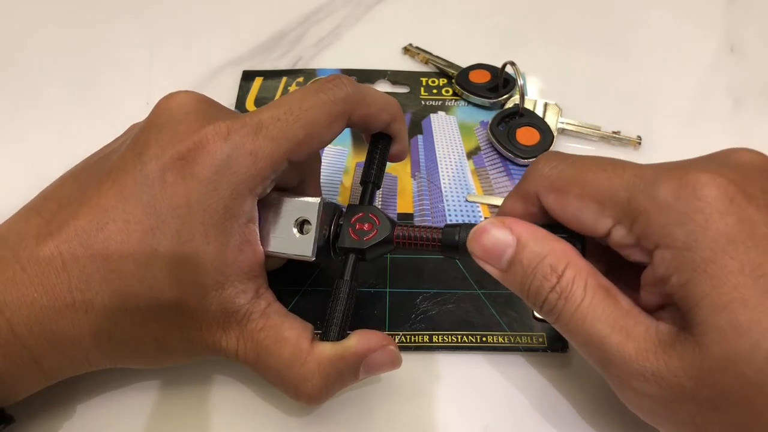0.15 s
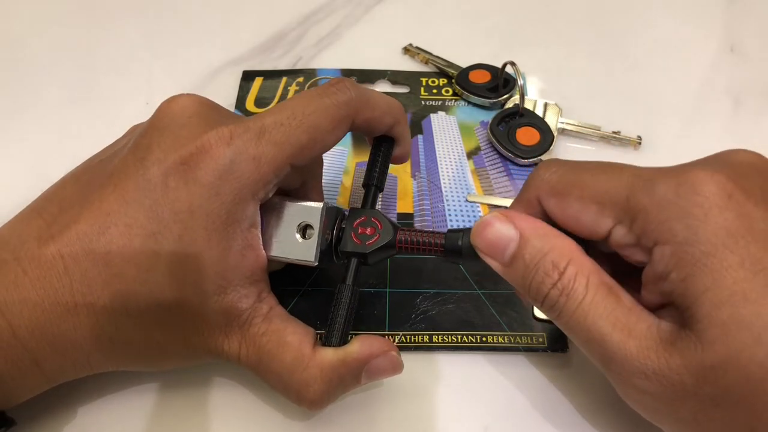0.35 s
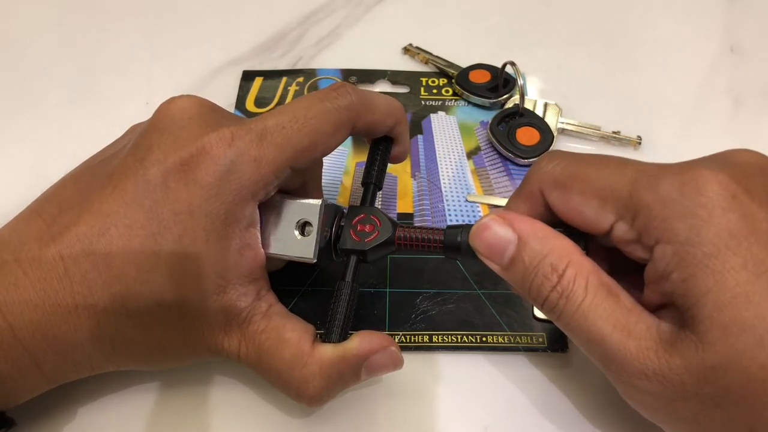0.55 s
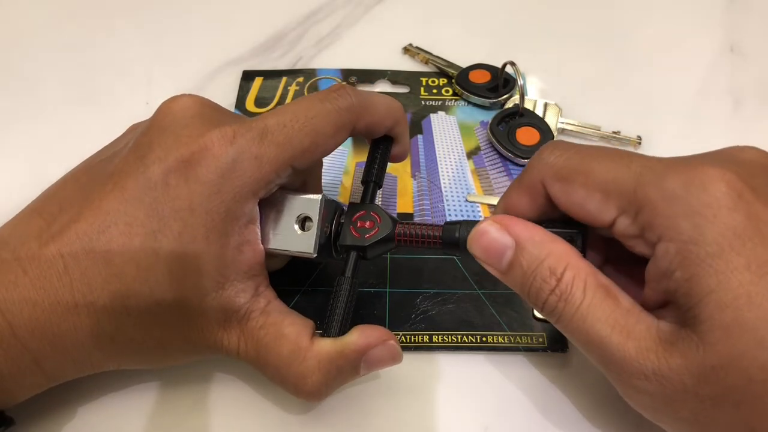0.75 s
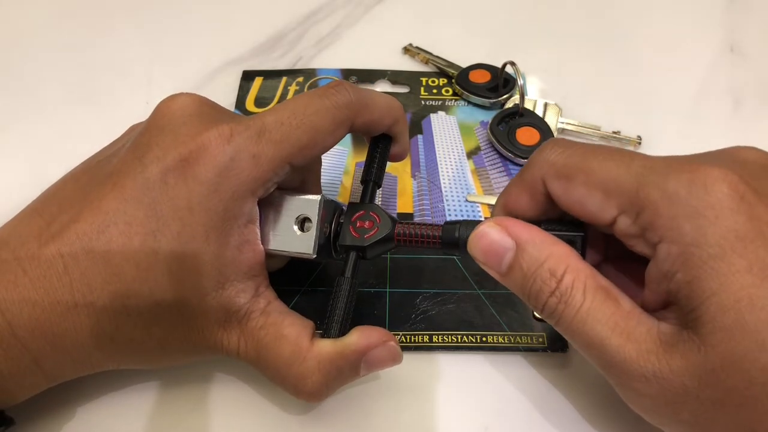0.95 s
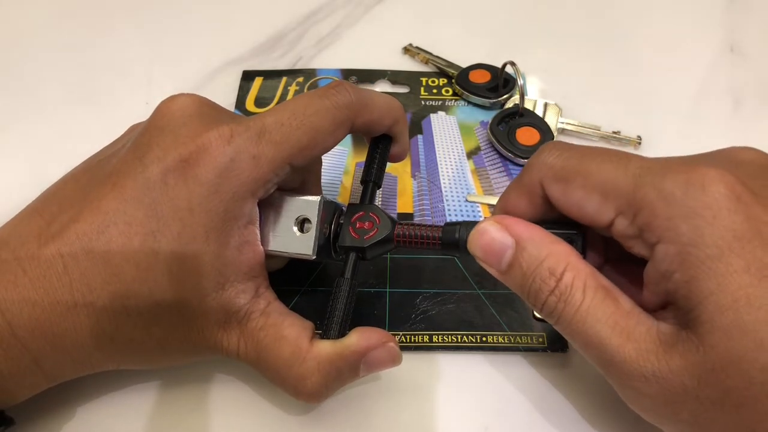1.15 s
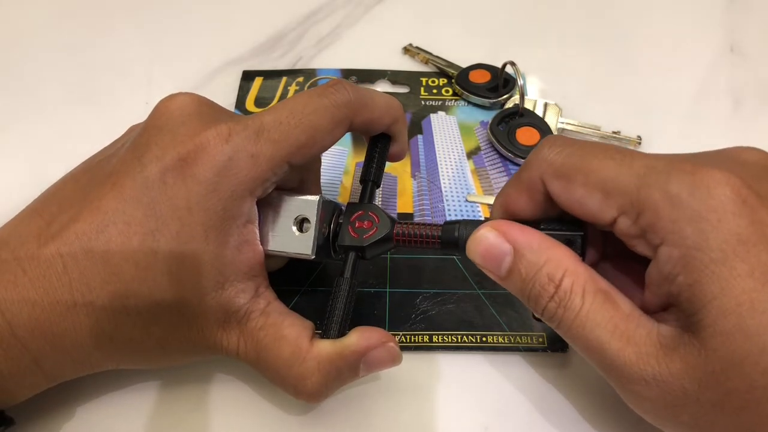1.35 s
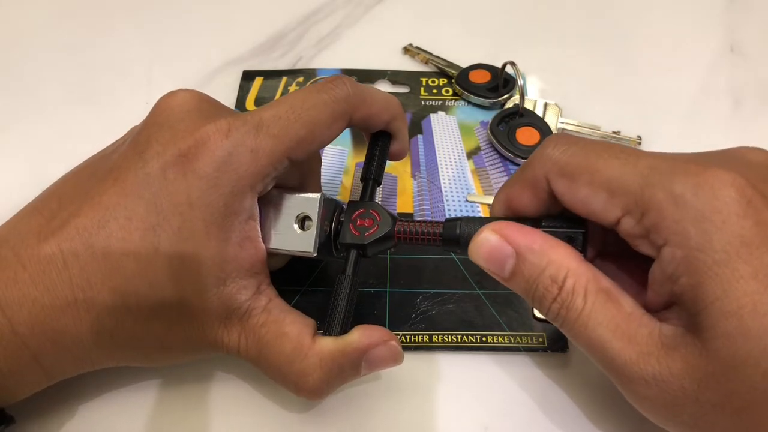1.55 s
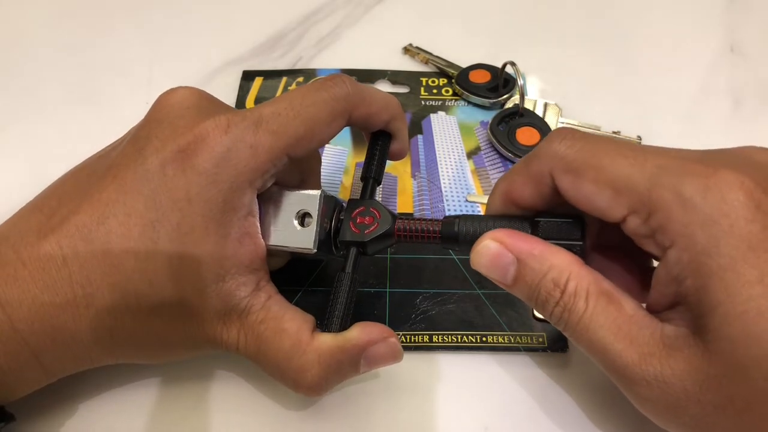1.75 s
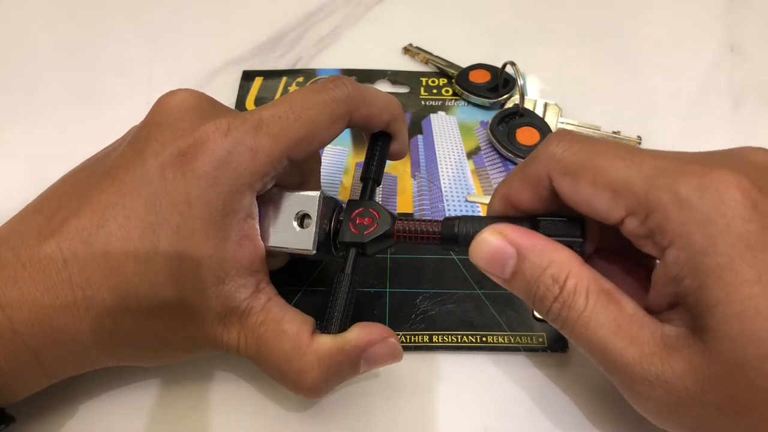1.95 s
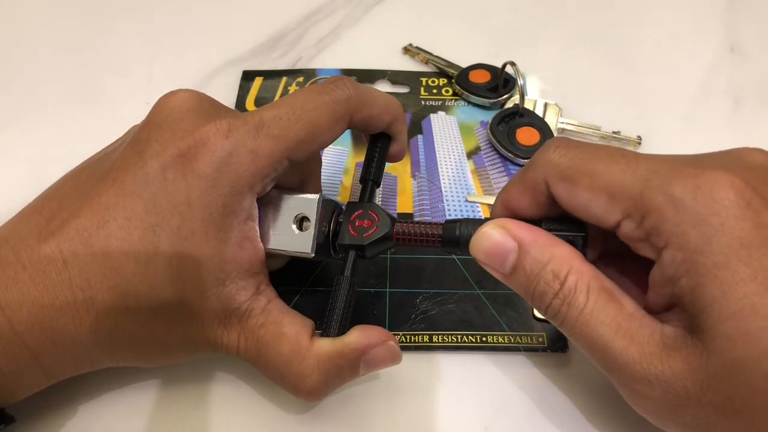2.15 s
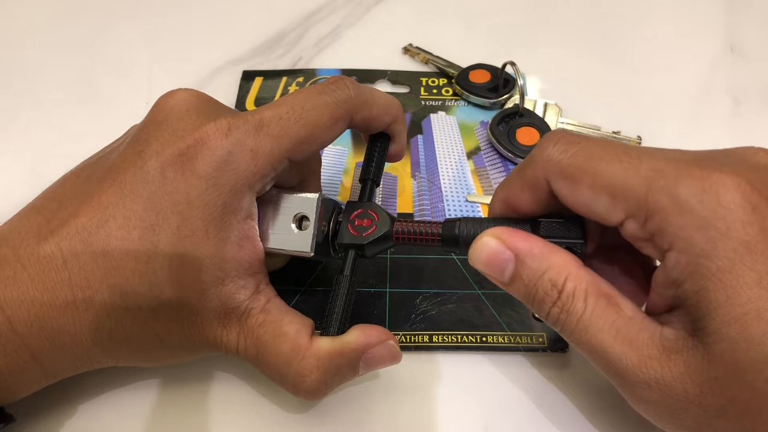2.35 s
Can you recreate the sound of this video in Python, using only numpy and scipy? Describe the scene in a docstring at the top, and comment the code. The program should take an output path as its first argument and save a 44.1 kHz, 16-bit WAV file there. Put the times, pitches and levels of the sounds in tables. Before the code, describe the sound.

A padlock is picked close by in a small quiet room. Light ticks and dull handling bumps come at about 0.1 seconds, then one bright, very short metal click at 0.2 seconds, with a few more soft bumps. Fingers rub faintly on the tool. At 1.6 seconds the pick gives a softer, scratchy click, followed by tiny ticks near 1.9. Low hum and hiss continue until about 2.5 seconds.

```python
"""Light ticks and dull bumps come first, as a disc padlock is picked by hand in a small quiet room.
A disc snaps round with one bright click; later the pick tip chatters over a disc. Each impact excites
the normal modes of the metal, which the hands damp within milliseconds. Fingers rub on the tool,
making friction noise; mains hum, room rumble and hiss lie beneath."""
import sys
import numpy as np
from scipy import signal
from scipy.fft import rfft, irfft
from scipy.io import wavfile

SR = 44100
rng = np.random.default_rng(int(sys.argv[2]) if len(sys.argv) > 2 else 0)


def transcribe(u):
    """Save the signal u as a 16-bit wav file named by the first command-line argument.

    u: samples, shape (n,) or (channels, n), limited to [-1, 1]; the rate is SR.
    q: integer samples, one column per channel.
    """
    v = np.clip(np.atleast_2d(u).T, -1, 1)
    q = np.round(v * 32767).astype(np.int16)
    wavfile.write(sys.argv[1], SR, q)


N = 110250

# a disc hits its stop and rebounds: start_s, level_db
DISC_SNAPS = [(0.233513, -31.5), (0.234305, -8.6), (0.238166, -34)]
# modes of the disc in the lock body: pitch_hz, gain_db, t60_s
DISC_MODES = [(1100, -18, 0.0018), (1840, -36.5, 0.033), (2340, -29, 0.025), (3010, -37, .0097),
              (4440, -30.5, 0.019), (5071, -10, .0017), (6530, -14.5, 0.0015), (7760, -7.5, 0.0073),
              (8209, -13.5, .0047), (10000, -4.5, 0.0029), (11609, -19.5, 0.0063), (13900, -17, .0051),
              (14390, .2, .0077), (15420, -25, .019)]
# contacts of the pick tip with a disc: start_s, level_db
PICK_CHATTER = [(1.604366, -35.8), (1.604865, -43), (1.605523, -24.9), (1.606997, -42), (1.60761, -33.5),
                (1.608918, -49)]
# modes of the pick: pitch_hz, gain_db, t60_s
PICK_MODES = [(1740, -27, .025), (2280, -10, 0.015), (2770, -19, 0.017), (3486, -18, 0.017),
              (4320, 4.5, 0.0021), (4670, -16.5, 0.015), (5500, -4, 0.0033), (6430, -6.5, 0.02),
              (7340, -8, 0.0078), (7900, -13, 0.0087), (11650, -9, 0.013), (12500, -15, .008),
              (13600, -11, .0144), (14800, -4, 0.0074), (15300, -17, 0.026)]
# spectra of the fizz after the snap and the chatter: frequency_hz, gain_db
DISC_FIZZ = [(300, 8), (900, -4), (2000, -2), (5000, -2), (7200, -2), (8200, 5.5), (9300, -6.5),
             (11500, -8), (13700, -6.5), (14600, 12.5), (15700, 0), (16100, -19)]
PICK_FIZZ = [(1000, -28), (2500, -2), (4200, 5), (6000, -2), (8200, -2), (10500, -4), (14000, -5),
             (15100, 11), (15650, 14), (16000, -22)]
# touches of the pick in the keyway: start_s, level_db, centre_hz, width_octaves, decay_s
KEYWAY_TICKS = [(0.0158, -53, 11000, 0.82, 0.00066), (0.1212, -48, 14300, .12, 0.00094),
                (0.1223, -52, 5000, .8, 0.0012), (0.1236, -50.5, 3200, 0.96, .0028),
                (0.1243, -44, 6850, 0.14, .001), (0.1293, -44.5, 6310, .22, 0.00046),
                (0.211, -54.5, 13000, .5, 0.0004), (0.2468, -53, 3800, .6, .0016),
                (0.2535, -60.5, 2500, 0.79, 0.0019), (0.2705, -60, 3780, 0.65, .002),
                (0.2805, -59, 3500, 0.98, 0.0037), (1.9027, -61, 8470, .13, 0.00095),
                (1.953, -66.5, 2820, 0.37, 0.0054)]
# the lock shifts in the hand: start_s, level_db
BODY_BUMPS = [(0.1032, -44.5), (0.1156, -50.5), (0.1243, -42.5), (0.1324, -47), (0.2345, -53),
              (0.2515, -52.5), (0.2620, -46), (0.2675, -48.5), (0.2785, -46), (0.2875, -55)]
# modes of the hand-held lock body: pitch_hz, gain_db, t60_s
BODY_MODES = [(551, -5.5, 0.01), (809, -3.5, .010), (1216, -8.5, 0.0028)]
# fingers rub and shift their grip: middle_s, half_length_s, level_db, centre_hz, width_octaves
FINGER_RUBS = [(0.131, 0.03, -56, 191, 0.38), (0.293, 0.061, -57, 165, .2), (0.638, 0.12, -68.5, 326, 1.37),
               (0.74, 0.095, -76.5, 2957, 0.66), (1.404, 0.012, -69, 2410, .6),
               (1.509, 0.1, -79, 3490, 0.54), (1.98, 0.051, -77.5, 2800, 0.98),
               (2.397, .13, -75.5, 12000, 1.6)]
# spectrum of the reverberation: frequency_hz, gain_db
ROOM_COLOUR = [(300, 15), (900, 4), (2000, 3.5), (4500, 1), (7600, -11.5), (8400, -7.5), (9500, -8),
               (11000, -5.5), (13400, -9), (14400, -9.5), (14950, -8), (16200, -17)]
# envelope of the mains hum: time_s, level_db
MAINS_LEVEL = [(0, -66), (1.2, -69), (1.45, -64), (2.1, -64), (2.5, -64.5)]
# narrow bands of hum and whirr: centre_hz, width_hz, level_db
HUM_BANDS = [(49, 11, -71.5), (161.6, 14, -65.5), (205, 5.9, -69.5), (250.6, 17, -69.5), (3410, 440, -77.5)]
# spectra of the room's rumble and hiss: frequency_hz, gain_db
RUMBLE_SPECTRUM = [(25, -32), (45, -15), (70, -14), (120, -7.5), (170, -8), (260, -4), (315, -4),
                   (400, -11), (470, -16.5), (600, -24.5), (810, -16.5), (1200, -25.5), (2000, -42),
                   (4000, -59.5)]
HISS_SPECTRUM = [(300, -38.5), (1500, 3), (1950, -2), (2350, 0.5), (2850, -5), (4200, -7.5), (6500, -8),
                 (8000, -12), (10200, -10.5), (12500, -13), (15600, -8.5), (16100, -41)]


def disc_snap():
    """Impact excitation: a disc strikes its stop and rebounds, ringing at each contact."""
    return strike(DISC_SNAPS, DISC_MODES, crack_db=-26.5, crack_s=.0041, rise_s=.0001, low_hz=650)


def pick_chatter():
    """Repeated impact: contacts in quick succession excite the modes of the pick."""
    return strike(PICK_CHATTER, PICK_MODES, crack_db=-7.5, crack_s=.0017, rise_s=.00006, low_hz=1830)


def body_bumps():
    """Heavy damping: the hand absorbs the vibration of the shifting lock, leaving dull bumps."""
    return strike(BODY_BUMPS, BODY_MODES, crack_db=-20.5, crack_s=.0014, rise_s=.000089, low_hz=250.2)


def strike(hits, modes, crack_db, crack_s, rise_s, low_hz):
    """Modal superposition: each contact gives damped sinusoids and a crack; little bass is radiated."""
    out, size = np.zeros(N), SR // 20
    for start, db in hits:
        span = slice(int(start * SR), int(start * SR) + size)
        age = since(start)[span]
        ring = sum(undb(mode_db) * np.cos(2 * np.pi * hz * age) * burst(age, rise_s, t60 / np.log(1000))
                   for hz, mode_db, t60 in modes)
        crack = undb(crack_db) * rng.standard_normal(size) * burst(age, rise_s, crack_s)
        out[span] += undb(db) * (ring + crack)
    return signal.sosfilt(signal.butter(3, low_hz, "highpass", fs=SR, output="sos"), out)


def fizz(hits, spectrum, level_db):
    """Exponential decay: faint toneless noise dies away after the hardest contact of a click."""
    hardest_s = max(hits, key=lambda hit: hit[1])[0]
    return undb(level_db) * noise(colour(spectrum)) * burst(since(hardest_s), .00053, decay_s=.042)


def keyway_ticks():
    """Transient excitation: each light touch of the pick radiates a brief band of noise."""
    return sum(undb(db) * noise(band(hz, octaves)) * burst(since(start), rise_s=.00024, decay_s=decay)
               for start, db, hz, octaves, decay in KEYWAY_TICKS)


def finger_rubs(top_hz=15800, grain_hz=154, grain_db=2):
    """Stick-slip friction: skin catches and slides on the handle, giving grainy swells of noise."""
    grain = undb(grain_db * noise(lambda f: np.exp(-f / grain_hz)))
    slide = np.zeros(N)
    for middle, half, db, hz, octaves in FINGER_RUBS:
        friction = noise(lambda f: band(hz, octaves)(f) * (f < top_hz))
        slide += undb(db) * friction * swell(middle, half)
    return slide * grain / np.sqrt(np.mean(grain ** 2))


def reverberation(x, t60_s=.33, gap_s=.0013, build_s=.00053):
    """Convolution with decaying noise models the room's diffuse reflections, weaker in the treble."""
    tail = rng.standard_normal(N) * burst(since(gap_s), build_s, t60_s / np.log(1000))
    tail /= np.sqrt(np.sum(tail ** 2))
    f = np.maximum(np.arange(N + 1) * SR / (2 * N), 1)
    return irfft(rfft(x, 2 * N) * rfft(tail, 2 * N) * colour(ROOM_COLOUR)(f))[:N]


def mains_hum(pitch_hz=100.9):
    """A pure tone at twice the supply frequency; its level dips, then grows a little."""
    level_db = np.interp(since(0), *np.array(MAINS_LEVEL).T)
    return undb(level_db) * tone(pitch_hz)


def drone(pitch_hz=199.5, level_db=-58):
    """Amplitude modulation: a low tone swells once out of the rumble."""
    return undb(level_db) * tone(pitch_hz) * swell(middle_s=.97, half_length_s=.085)


def room_noise(rumble_db=-59, drift_db=.8, hiss_db=-73):
    """Incoherent sources add in power: drifting rumble, wavering narrow-band hum and even hiss."""
    drift = noise(lambda f: np.exp(-f / 5))
    rumble = undb(rumble_db + drift_db * drift) * noise(colour(RUMBLE_SPECTRUM))
    hum = sum(undb(db) * noise(lambda f: 1 / (1 + ((f - hz) / width * 2) ** 2))
              for hz, width, db in HUM_BANDS)
    return rumble + hum + undb(hiss_db) * noise(colour(HISS_SPECTRUM))


def undb(db):
    """Decibels to amplitude ratio."""
    return 10 ** (np.asarray(db) / 20)


def tone(hz):
    """Sinusoid of unit rms."""
    return np.sqrt(2) * np.sin(2 * np.pi * hz * since(0))


def noise(gain):
    """Spectral shaping: white noise weighted by gain(frequency), scaled to unit rms."""
    f = np.maximum(np.arange(N // 2 + 1) * SR / N, 1)
    shaped = irfft(rfft(rng.standard_normal(N)) * gain(f), N)
    return shaped / np.std(shaped)


def colour(points):
    """Gain curve through (frequency_hz, gain_db) points on a log-frequency axis."""
    hz, db = np.array(points, float).T
    return lambda f: undb(np.interp(np.log(f), np.log(hz), db))


def band(hz, octaves):
    """Gaussian passband on a log-frequency axis."""
    return lambda f: np.exp(-.5 * (np.log2(f / hz) / octaves) ** 2)


def since(start_s):
    """Seconds elapsed since an onset, zero before it."""
    return np.maximum(np.arange(N) / SR - start_s, 0)


def burst(age, rise_s, decay_s):
    """Envelope of a transient: quick rise, exponential decay."""
    return (1 - np.exp(-age / rise_s)) * np.exp(-age / decay_s)


def swell(middle_s, half_length_s):
    """Gaussian envelope in time."""
    return np.exp(-.5 * ((since(0) - middle_s) / half_length_s) ** 2)


def scene():
    """Linear superposition of the direct sound, its reverberation and the background."""
    disc, pick = disc_snap(), pick_chatter()
    touches = keyway_ticks() + body_bumps()
    tails = fizz(DISC_SNAPS, DISC_FIZZ, level_db=-54) + fizz(PICK_CHATTER, PICK_FIZZ, level_db=-60)
    reflections = reverberation(undb(-20) * disc + undb(-23.5) * pick + undb(-14.5) * touches)
    direct = disc + pick + touches + tails + finger_rubs()
    background = mains_hum() + drone() + room_noise()
    return (direct + reflections + background)[None]


def record(dry):
    """Band limiting: a steep low-pass filter removes the treble above 16.4 kHz."""
    return signal.sosfilt(signal.ellip(8, .2, 70, 16400, fs=SR, output="sos"), dry)


dry = scene()
out = record(dry)
transcribe(out)
```